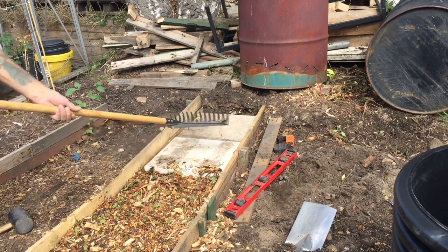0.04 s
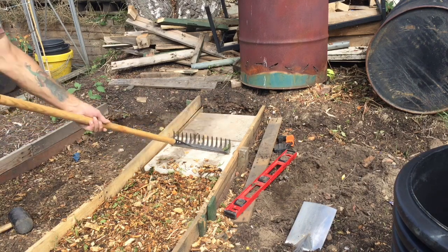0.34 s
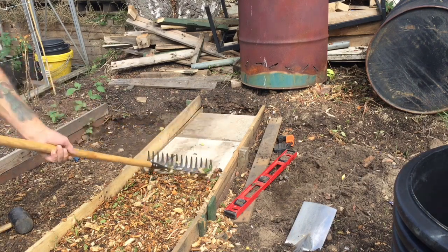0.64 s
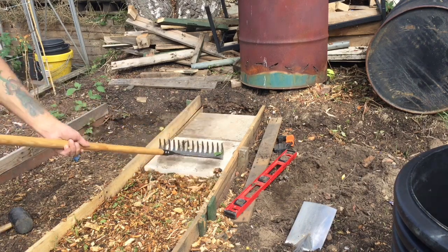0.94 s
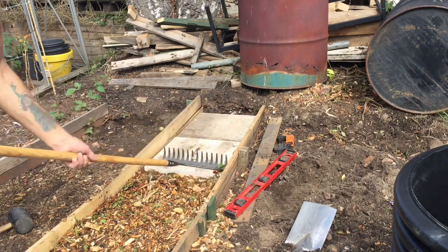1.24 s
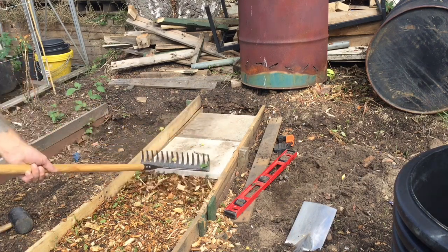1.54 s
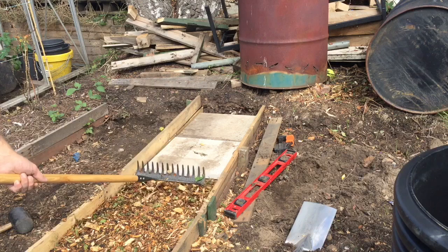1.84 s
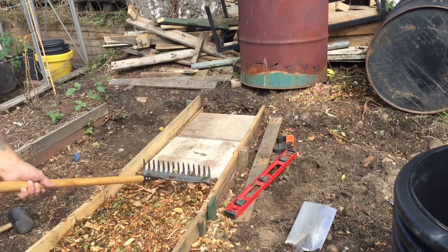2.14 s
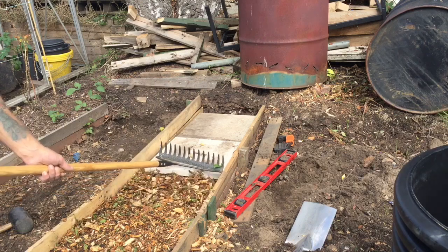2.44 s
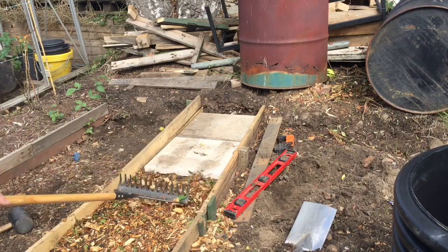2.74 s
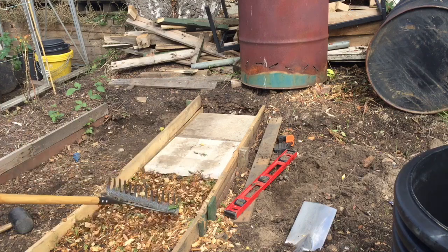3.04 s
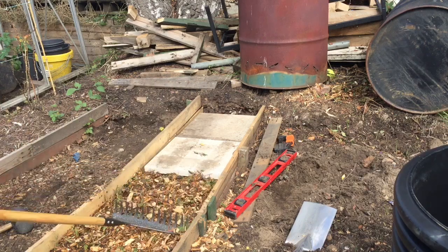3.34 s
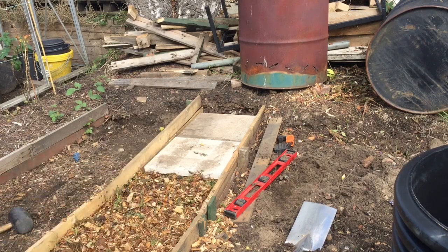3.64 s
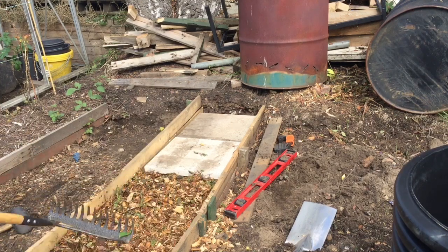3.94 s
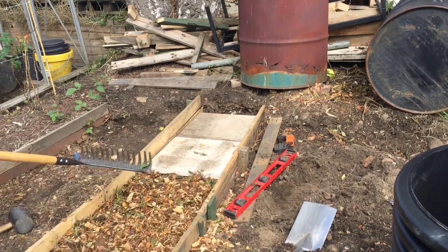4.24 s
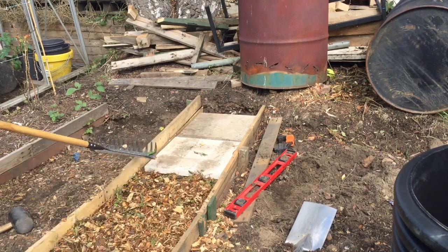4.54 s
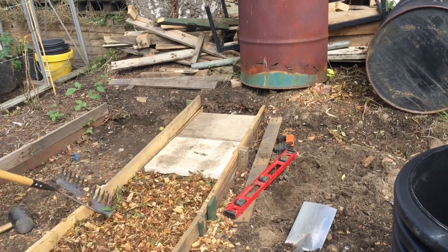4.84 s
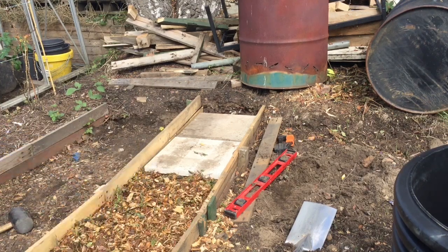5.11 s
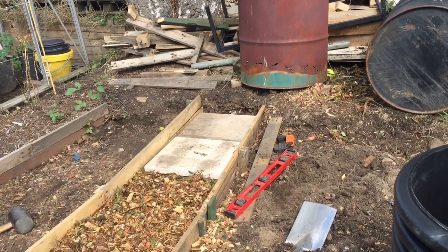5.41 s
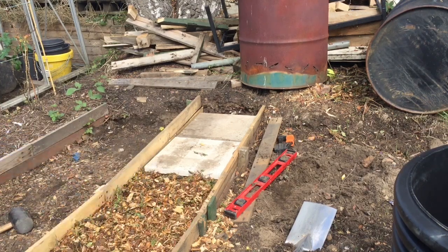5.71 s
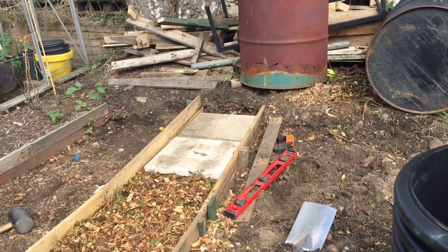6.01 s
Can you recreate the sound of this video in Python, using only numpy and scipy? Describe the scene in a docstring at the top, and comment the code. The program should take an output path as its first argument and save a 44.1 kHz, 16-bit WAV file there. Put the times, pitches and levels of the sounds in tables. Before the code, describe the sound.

Outdoors in a yard, the metal tines of a rake clatter onto a stone slab twice, each landing followed by a short, zinging scrape. Much quieter shoves through bark chips follow, rustling and splintering, with muffled steps on soft ground. The rake bumps a plank with a hollow clack, and a last few chips snap. Far-off traffic and a faint hum that comes and goes lie underneath.

```python
"""Clanks, rasps and a woody rustle: a steel garden rake is set down twice on a paving slab and dragged,
then pushes bark chips along a path. Its head rings when it lands, and grit plucks its tines (the teeth).
The chips rub and snap, and at one point the rake bumps the board that edges the path.
Dull footfalls and a faint hum sound over the murmur of distant traffic."""
import sys
import numpy as np
from scipy import signal
from scipy.fft import rfft, irfft
from scipy.io import wavfile

SR = 44100
rng = np.random.default_rng(int(sys.argv[2]) if len(sys.argv) > 2 else 0)


def persist_wave(psi):
    """Save psi, clipped to +-1, as 16-bit WAV."""
    counts = np.round(np.clip(psi, -1, 1) * 32767).astype(np.int16)
    wavfile.write(sys.argv[1], SR, np.atleast_2d(counts).T)


N = 276507
TIME = np.arange(N) / SR
HIT_TIME = TIME[:SR * 6 // 10]  # the 0.6 s that one hit may last


def clanks(rake, floor_db=-16, boost_db=4, boost_width_hz=50):
    """The tines clatter onto the slab, and once against the wooden edging board; the steel rings on."""
    # each landing: t/s, level/dB, treble limit/Hz, ring level/dB, clatter fade/s, landing time/s,
    # boosted note/Hz
    landings = [(0.0458, -17, 2400, -1.5, 0.034, 0.0095, 2156),
                (0.066, -13, 8500, 2.5, 0.099, 0.0051, 3484), (0.881, -15, 2570, -4.5, 0.078, 0.0095, 2401),
                (4.377, -30.5, 2630, -15.5, .05, 0.0052, 2401)]
    # the tone of the clattering tines: f/Hz, level/dB
    clatter_tone = [(60, -23), (150, -19.5), (300, -9), (480, -13), (650, -1), (1200, -1.5), (2100, -3.5),
                    (3300, -8.5), (5000, -13), (7000, -20), (10000, -28), (16000, -29.5)]
    out = np.zeros(N)
    for s, db, bright_hz, ring_db, t60, landing_s, note_hz in landings:
        contact = lambda hz: 1 / np.sqrt(1 + (hz / bright_hz) ** 10) + amp(floor_db)  # softer is duller
        colour = lambda hz: contact(hz) * amp(boost_db * np.exp(-((hz - note_hz) / boost_width_hz) ** 2))
        softened = [(hz, level + 20 * np.log10(contact(hz))) for hz, level in clatter_tone]
        clatter = shaped(rng.standard_normal(len(HIT_TIME)), softened)
        settling = np.minimum(1, fade(t60) * amp(60 * landing_s / t60))  # holds until all tines touch
        sound = clatter * settling + amp(ring_db) * ring(rake, colour)
        onset = 1 - np.exp(-(HIT_TIME / (0.23 * landing_s)) ** 2)
        add(out, s, amp(db) * sound * onset)
    return out


def drags(rake, rasp_db=-4, steel_db=-3, hiss_db=-7, soft_hz=1800, zing_hz=10000):
    """Grains of the slab pluck the tines, which rasp, zing and keep ringing after the stroke."""
    # each pull: touch/s, hardest moment/s, lift/s, relative rasp/dB, relative hiss/dB, easing/(dB per s)
    strokes = [(0.124, 0.32, 0.41, -23.5, -49.5, 61), (0.96, 1.065, 1.16, -31.5, -47.5, 262.5)]
    # the tone of the rasping tines: f/Hz, level/dB
    rasp_tone = [(60, -37.5), (150, -24.5), (290, -4.5), (450, -11.5), (630, -3.5), (1100, 2), (1400, -20),
                 (1900, -0.5), (2450, -22.5), (3400, -16.5), (5000, -24.5), (6500, -37), (7400, -66),
                 (16000, -53)]
    # the tone of the grit hissing under them: f/Hz, level/dB
    grit_tone = [(2500, -11), (4500, 2), (6500, 19), (7500, -26), (8500, 6.5), (10500, -18.5),
                 (15500, -0.5)]
    judder = amp(2.2 * noise([(0, -20), (25, 0), (70, 0), (300, -40), (2000, -120)]))
    plucks = unit(judder * grains(per_s=2300, spread_db=0.5))
    grit = unit(judder * grains(per_s=2400, spread_db=0))
    pressure, hiss_level = np.zeros(N), np.zeros(N)
    for touch, hardest, lift, db, grit_db, easing in strokes:
        contact, lean_db = pull(touch, hardest, lift, easing)
        pressure += contact * amp(db + lean_db)
        contact, lean_db = pull(touch, hardest, lift, easing, lead_s=0.0098)  # loose grit hisses early
        hiss_level += contact * amp(grit_db + 0.85 * lean_db)
    steel = excite(plucks * pressure, ring(rake, lambda hz: 1 / (1 + (hz / soft_hz) ** 4) + 0.042))
    zing = excite(grit * hiss_level, ring(rake, lambda hz: 1 / (1 + (zing_hz / hz) ** 2.53)))
    rasp = amp(rasp_db) * pressure * shaped(plucks, rasp_tone)
    hiss = amp(hiss_db) * hiss_level * shaped(grit, grit_tone)
    return rasp + hiss + amp(steel_db) * steel + zing


def pull(touch, hardest, lift, easing, lead_s=0, bite_s=0.04, lift_s=0.00815, lean_db_per_s=90):
    """The arm leans into a pull and eases off. Gives the contact (0 to 1) and the pressure in dB."""
    t = TIME + lead_s - hardest
    contact = np.clip(np.minimum((TIME - touch) / bite_s, (lift - TIME) / lift_s) + 0.5, 0, 1)
    building_db = np.maximum(lean_db_per_s * t, -16)  # at least the rake's own weight presses
    return contact, np.where(t < 0, building_db, -easing * t)


def chips(rake, rustle_db=-4, crumbs_db=-3, tines_db=-7):
    """Bark chips rub and tumble with tiny woody rings; crumbs trickle and the tines sing faintly."""
    # each shove: peak/s, relative rustle/dB, relative crumbs/dB, build-up/s, settling/s
    shoves = [(1.605, -55, -82, 0.0068, 0.0077), (1.66, -67, -71, 0.016, 0.025),
              (2.378, -51, -52, .009, .012), (2.415, -69, -54.5, .012, 0.027),
              (2.599, -47.5, -51.5, 0.017, 0.021), (3.08, -56, -68, 0.018, 0.015),
              (3.172, -45.5, -62, 0.023, 0.02), (3.24, -56, -50, 0.046, 0.048),
              (3.41, -74, -81, 0.022, 0.056), (4.154, -56, -60, .009, .01),
              (4.468, -55.5, -72, 0.0068, 0.039), (4.568, -44, -53, 0.033, 0.06),
              (4.71, -36.5, -51, 0.008, 0.023), (4.975, -54.5, -66, 0.038, 0.066)]
    # the tone of rubbing chips: f/Hz, level/dB
    bark_tone = [(250, 17.5), (700, 12), (1600, 11.5), (2700, 1.5), (4200, 8.5), (6000, -47), (9000, -24),
                 (16000, -34)]
    # the tone of falling crumbs: f/Hz, level/dB
    crumb_tone = [(2000, -18), (4300, -3), (5300, -7), (8500, 1), (10500, -3), (13000, -4), (15800, -3)]
    rustle = np.zeros(N)
    for hz in np.geomspace(1200, 8000, num=10):
        chip = np.sin(2 * np.pi * hz * HIT_TIME) * fade(22 / hz)
        rustle += np.sqrt(hz) * excite(grains(per_s=200, spread_db=1), chip)
    stirring = sum(amp(db) * shove(s, build, settle) for s, db, _, build, settle in shoves)
    trickle = sum(amp(db) * shove(s, build, 0.84 * settle) for s, _, db, build, settle in shoves)
    taps = stirring * grains(per_s=700, spread_db=9.5)
    tines = excite(taps, ring(rake, lambda hz: hz ** 2 / (1 + (hz / 9500) ** 6)))
    crumbs = trickle * shaped(grains(per_s=4500, spread_db=5), crumb_tone)
    bark = stirring * shaped(rustle, bark_tone)
    return amp(rustle_db) * bark + amp(crumbs_db) * crumbs + amp(tines_db) * tines


def shove(s, build, settle):
    """The bark moves more and more until time s, then comes to rest."""
    distance = np.maximum((s - TIME) / build, (TIME - s) / settle)
    return np.exp(-np.minimum(distance, 20))


def snaps(notes=7, chip_fade_s=0.095, dry_crack_s=0.034):
    """A chip splinters between the tines and clinks with a few notes of its own."""
    # each breaking chip: t/s, level/dB, f/Hz, splinter fade/s
    breaks = [(1.605, -56.5, 2470, 0.045), (2.378, -55, 3500, 0.039), (2.483, -49.5, 3230, 0.038),
              (2.587, -51.5, 3850, 0.1), (2.603, -49, 2184, 0.05), (3.07, -47.5, 1920, 0.039),
              (3.089, -50.5, 2760, 0.082), (3.163, -46.5, 1750, 0.16), (3.176, -48.5, 2660, 0.25),
              (3.3992, -50.5, 3690, 0.015), (4.566, -41.5, 3746, 0.08), (4.709, -48, 3810, 0.039),
              (4.719, -35.5, 1556, 0.038), (4.741, -33, 2600, 0.023), (4.75, -35, 2950, 0.013),
              (4.963, -51, 2920, 0.048), (4.986, -36.5, 4100, 0.026)]
    out = np.zeros(N)
    for s, db, hz, t60 in breaks:
        tone = [(hz / 12, -25), (hz / 2, -8), (hz, 0), (hz * 1.22, -10), (hz * 4, -29)]
        splinters = shaped(rng.standard_normal(len(HIT_TIME)), tone) * fade(t60)
        octaves = (np.arange(notes) + rng.random(notes)) / notes * 2 - 1  # up to one either way
        chip = body(np.c_[hz * 2 ** octaves, 4 * rng.standard_normal(notes), np.full(notes, chip_fade_s)])
        clink = ring(chip, lambda f: 1 / (1 + (3 * np.log(f / hz)) ** 2))
        clink /= 1 + (dry_crack_s / t60) ** 6  # a very quick break hardly clinks
        add(out, s, amp(db) * (splinters + clink) * rise(0.0004))
    return out


def board():
    """The plank at the path's edge clacks as the steel meets it and booms as the weight follows."""
    # the notes the plank rings with: f/Hz, level/dB, fade/s
    plank_modes = [(131.4, 0, 0.28), (203, 0, 0.086), (269, -6, 0.12), (397, -1.5, 0.076),
                   (549, 3.5, 0.055), (722, -4, 0.078), (796, 6, 0.038), (1220, -20, 0.11),
                   (1296, 2.5, 0.041), (1516, -12.5, 0.14)]
    # each bump: t/s, level/dB, favoured pitch/Hz
    bumps = [(4.378, -22.5, 1210), (4.391, -29.5, 144), (4.677, -38, 450)]
    plank, out = body(plank_modes), np.zeros(N)
    for s, db, pitch_hz in bumps:
        boom = ring(plank, lambda hz: 1 / (1 + np.log(hz / pitch_hz) ** 2))
        add(out, s, amp(db) * boom * rise(0.00045))
    return out


def flicks(rake, focus=12):
    """A tine slips off a chip or the slab's edge and pings near one pitch."""
    # each slip: t/s, level/dB, favoured pitch/Hz
    slips = [(0.407, -55, 2530), (3.371, -62.5, 8700), (4.149, -58.5, 3520), (4.4656, -53.5, 2600)]
    out = np.zeros(N)
    for s, db, pitch_hz in slips:
        ping = ring(rake, lambda hz: 1 / (1 + (focus * np.log(hz / pitch_hz)) ** 4))
        add(out, s, amp(db) * ping * rise(0.0008))
    return out


def steps(length_cycles=2.08):
    """Each footfall pushes the soft ground for about two slow vibrations: a dull thump."""
    # each thump: middle/s, level/dB, f/Hz
    thumps = [(2.892, -45, 80.4), (3.021, -39, 65.4), (3.123, -47, 70), (3.264, -45.5, 59.7),
              (3.3, -42.5, 72), (3.598, -44, 75), (3.735, -41, 55.3), (3.766, -39, 75.7), (3.826, -38, 60),
              (3.854, -38, 125), (4.132, -39, 82.6), (5.013, -39, 62), (5.372, -44, 60.8),
              (5.606, -44, 62.8), (5.871, -51.5, 54.6)]
    out = np.zeros(N)
    for s, db, hz in thumps:
        cycles = hz * (TIME - s)
        out += amp(db) * np.cos(2 * np.pi * cycles) * np.exp(-(3 * cycles / length_cycles) ** 2)
    return out


def yard_echo(x, echo_db=-17, t60=0.3, delay_s=0.008):
    """Storage drums, timber and a fence scatter the sound back as a short, dull echo."""
    tail = shaped(rng.standard_normal(len(HIT_TIME)), [(100, 0.5), (2500, -11), (14000, -9)])
    tail = tail * fade(t60) * (HIT_TIME > delay_s)
    return x + amp(echo_db) * excite(x, tail)


def traffic_and_hum(traffic_db=-55.5, hum_hz=291.6, waver=0.0029, ramp_s=0.063):
    """Distant traffic murmurs and swells slightly; a faint, wavering hum comes and goes."""
    # the tone of the traffic: f/Hz, level/dB
    traffic_tone = [(24, -26.5), (42, -14), (66, -9.5), (120, -12.5), (220, -16), (330, -13.5), (470, -19),
                    (760, -10), (1050, -13), (2000, -28.5), (3200, -35), (4800, -38.5), (6400, -38.5),
                    (16000, -48)]
    # each spell of humming: start/s, end/s, level/dB
    spells = [(-.2, 0.123, -50), (1.319, 2.144, -56.5), (2.526, 3.072, -58.5)]
    drift = [(0, 0), (4, 0), (30, -40), (200, -120)]  # keeps only slow changes
    out = amp(traffic_db + 0.5 * noise(drift)) * noise(traffic_tone)
    pitch_hz = hum_hz * (1 + waver * noise(drift))
    hum = np.sin(2 * np.pi * np.cumsum(pitch_hz) / SR)
    for start, end, db in spells:
        out += amp(db) * hum * np.clip(np.minimum(TIME - start, end - TIME) / ramp_s, 0, 1)
    return out


def body(modes, damping=1):
    """A ringing object: the pitch and dying wave of each mode (natural note). Damping shortens them."""
    hz, db, t60 = np.transpose(modes)
    levels = amp(db)[:, None] * fade(t60[:, None] / damping)
    return hz, levels * np.exp(2j * np.pi * hz[:, None] * HIT_TIME)


def ring(thing, colour):
    """One tap on a ringing object; colour says how strongly each pitch is set going."""
    hz, waves = thing
    push = colour(hz) * np.exp(2j * np.pi * rng.random(len(hz)))
    return np.sqrt(2) * (push @ waves).real / np.linalg.norm(push * waves[:, 0])


def excite(force, response):
    """Every little push in the force starts its own copy of the response."""
    return signal.oaconvolve(force, response / np.linalg.norm(response))[:N]


def grains(per_s, spread_db):
    """Tiny clicks at random moments; a wider spread makes a few of them stand out."""
    chance, size = rng.random(N), rng.laplace(size=N)
    at, clicks = chance < per_s / SR, np.zeros(N)
    clicks[at] = np.sign(size[at]) * amp(spread_db * np.minimum(abs(size[at]), 3))
    return unit(clicks)


def shaped(x, tone):
    """Gives a sound a tone, listed as (f/Hz, level/dB) points, at an average level of one."""
    hz, db = np.transpose(tone)
    f = np.fft.rfftfreq(len(x), 1 / SR)
    gain = amp(np.interp(np.log(f + 1), np.log(hz + 1), db))
    return unit(irfft(rfft(x) * gain, len(x)))


def noise(tone):
    """Steady noise with the given tone."""
    return shaped(rng.standard_normal(N), tone)


def rise(s):
    """Softens the very start of a hit."""
    return 1 - np.exp(-HIT_TIME / s)


def fade(t60):
    """Dies away by 60 dB in t60 seconds, the fade time in the tables."""
    return amp(-60 * HIT_TIME / t60)


def amp(db):
    """Turns decibels into a multiplier."""
    return 10 ** (np.asarray(db) / 20)


def unit(x):
    """Scales to an average level (rms) of one."""
    return x / np.sqrt(np.mean(x ** 2) + 1e-20)


def add(mix, s, sound):
    """Mixes a sound in at s seconds."""
    part = mix[max(round(s * SR), 0):][:len(sound)]
    part += sound[:len(part)]


def scene():
    """Raking in the yard: the head rings freely when it lands, more briefly when pressed into its work."""
    # the notes of the free steel head: f/Hz, level/dB, fade/s
    head_modes = [(630, -12, .1), (738, -12, .12), (908, -13, .14), (996, -12, .11), (1128, -2.5, .125),
                  (1299, -6, .09), (1527, -7, .19), (1834, -4, .15), (1876, -2.5, .18), (1949, -6, .16),
                  (2090, 1, .14), (2157, 0, .2), (2321, -6, .14), (2401, -17, .62), (2530, -16, .55),
                  (2589, -12, .2), (2960, -12, .22), (3021, -7, .18), (3239, -4, .16), (3486, 2.5, .11),
                  (3653, -2, .13)]
    # the higher notes of its tines: f/Hz, level/dB, fade/s
    tine_modes = [(4075, -14, .12), (4250, -19, .12), (4475, -10, .11), (4624, -15, .12), (4810, -14, .14),
                  (4904, -14, .11), (5098, -18, .12), (5400, -21, .12), (5815, -19, .14), (6350, -23, .12),
                  (6578, -18, .15), (6907, -28, .22), (7720, -27, .14), (8060, -22, .2), (8420, -17, .17),
                  (9098, -28, .15), (9561, -26, .17), (10100, -32, .14), (11483, -30, .14),
                  (12484, -30, .17), (13100, -34, .14), (13571, -28, .19), (14185, -26, .17),
                  (14713, -30, .14), (15601, -29, .12)]
    free = body(head_modes + tine_modes)
    pressed = body(head_modes + tine_modes, damping=1.4)
    work = clanks(free) + board() + drags(pressed) + chips(pressed) + snaps() + flicks(free)
    return (yard_echo(work) + steps() + traffic_and_hum())[None]


def record(dry, low_cut_hz=36, high_cut_hz=15900):
    """The microphone drops the deepest bass, clips at full scale and cuts the highest treble."""
    bass_cut = signal.butter(3, low_cut_hz, "high", fs=SR, output="sos")
    treble_cut = signal.firwin(511, high_cut_hz, window=("kaiser", 9), fs=SR)
    clipped = np.clip(signal.sosfilt(bass_cut, dry), -1, 1)
    return signal.oaconvolve(clipped, treble_cut[None], "same")


dry = scene()
out = record(dry)
persist_wave(out)
```